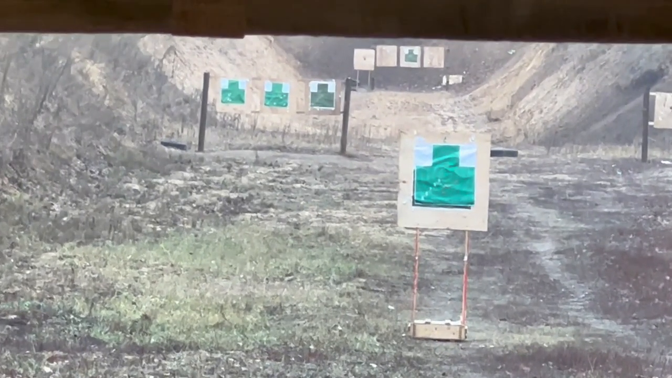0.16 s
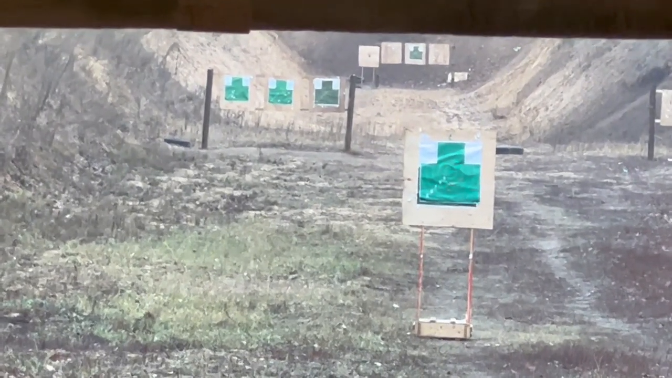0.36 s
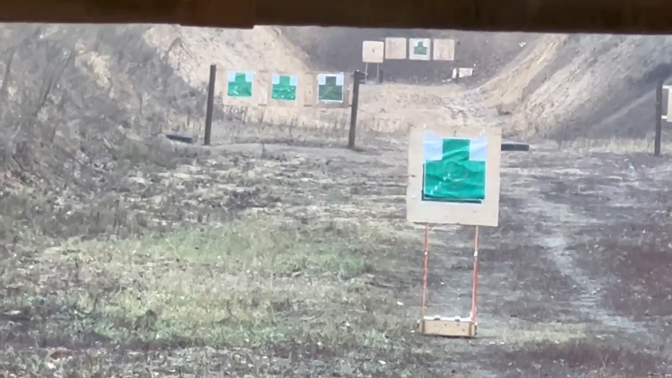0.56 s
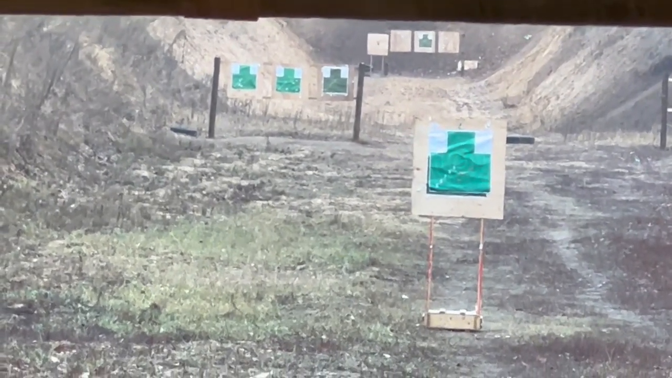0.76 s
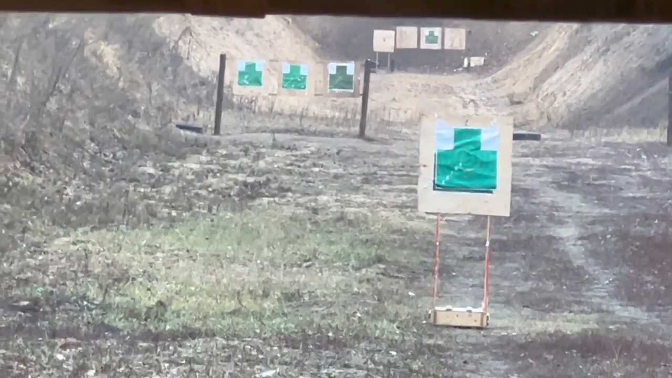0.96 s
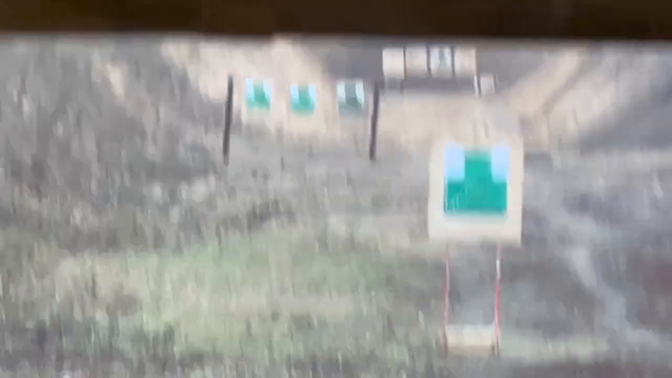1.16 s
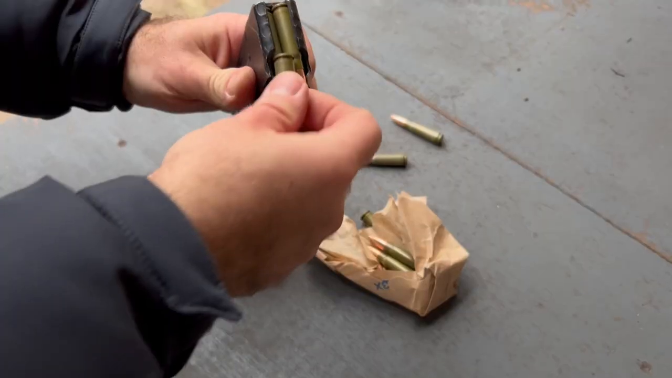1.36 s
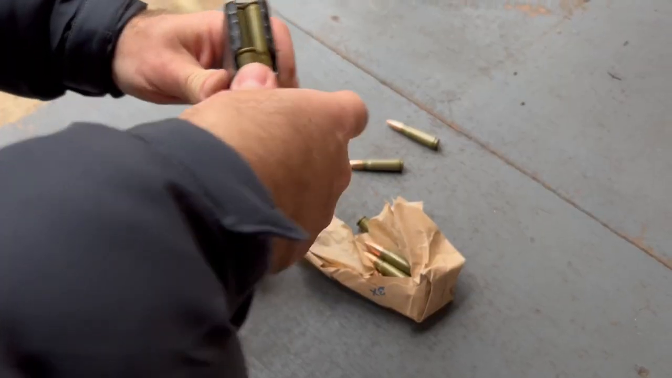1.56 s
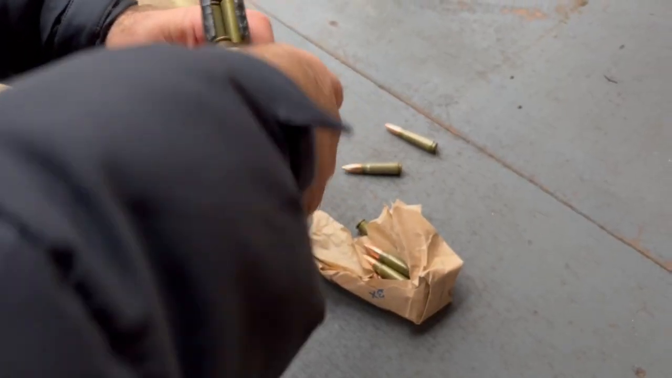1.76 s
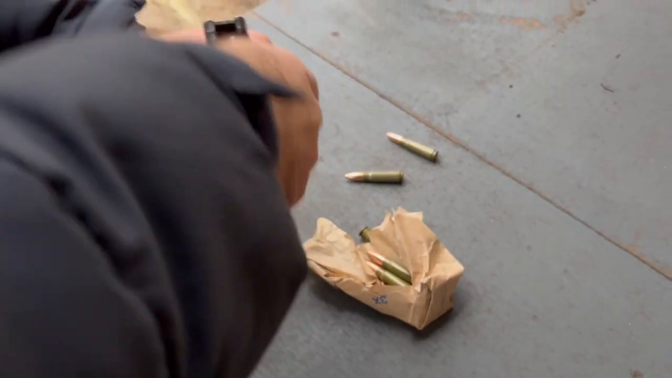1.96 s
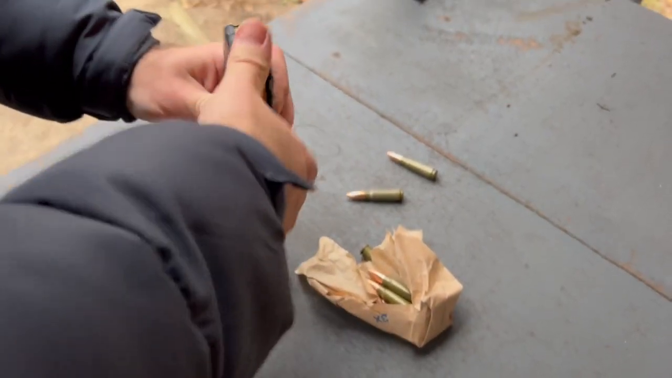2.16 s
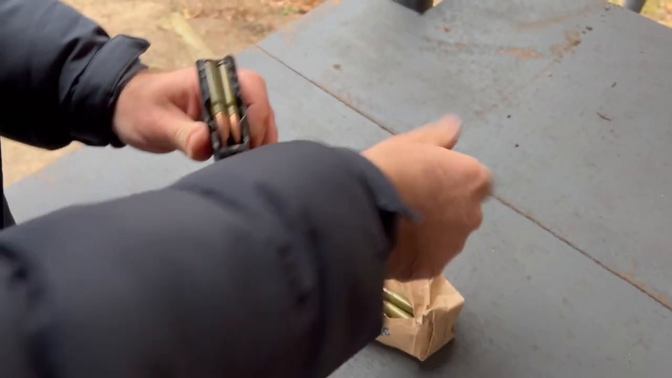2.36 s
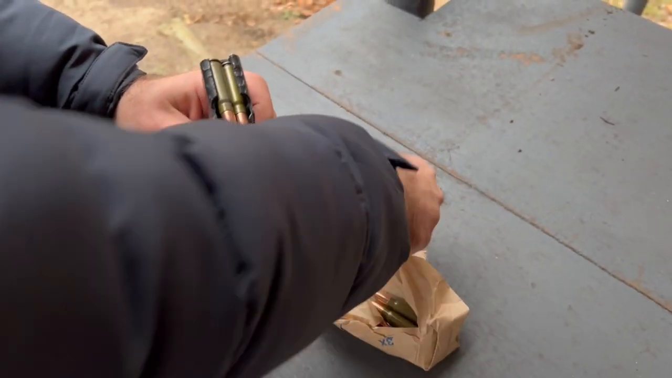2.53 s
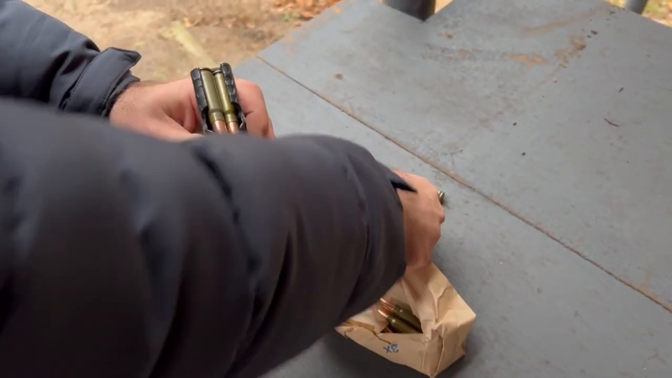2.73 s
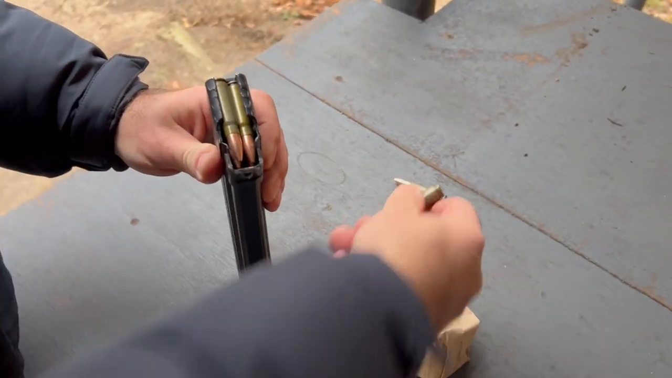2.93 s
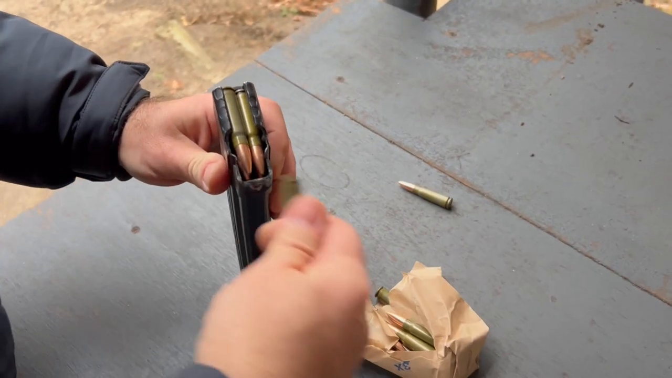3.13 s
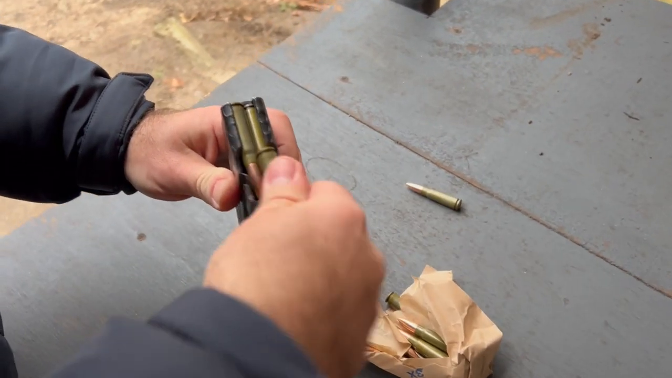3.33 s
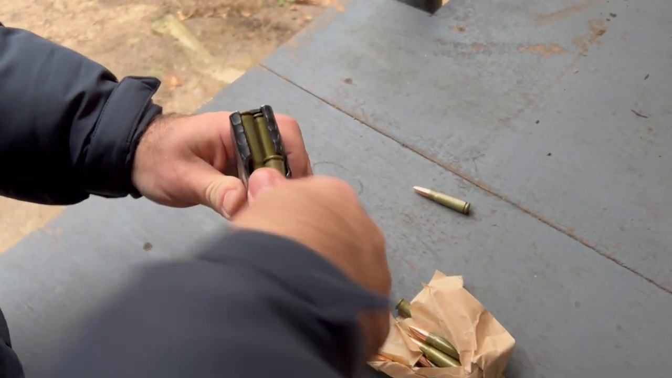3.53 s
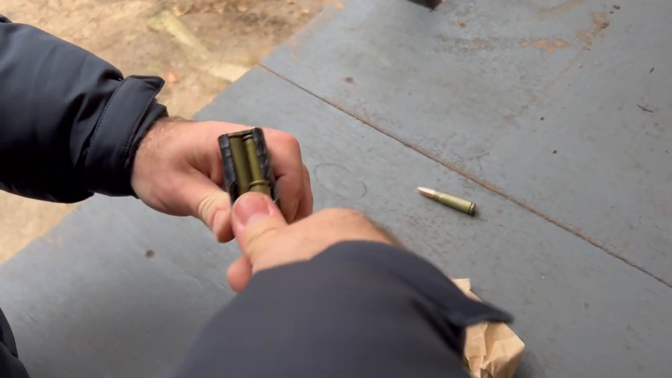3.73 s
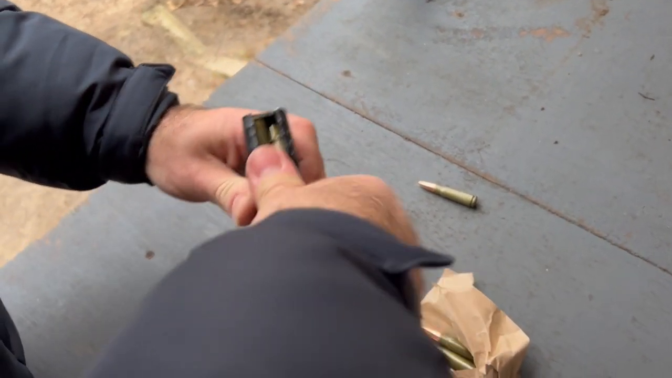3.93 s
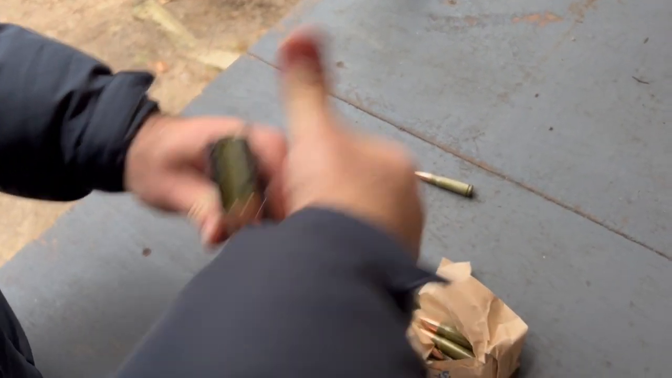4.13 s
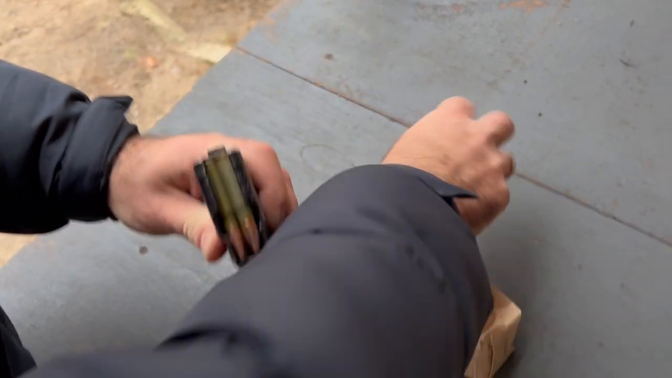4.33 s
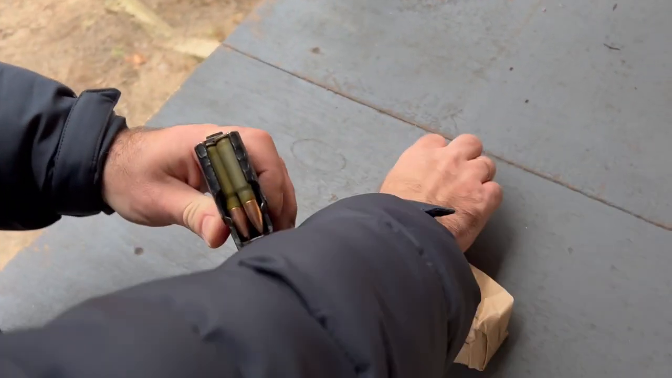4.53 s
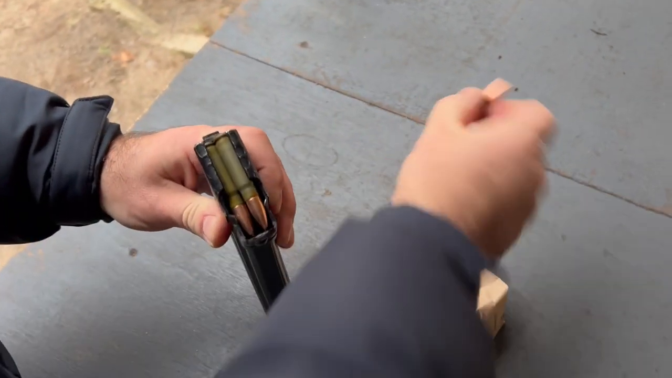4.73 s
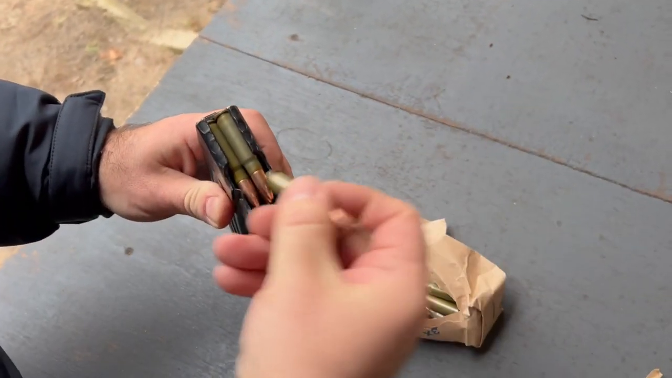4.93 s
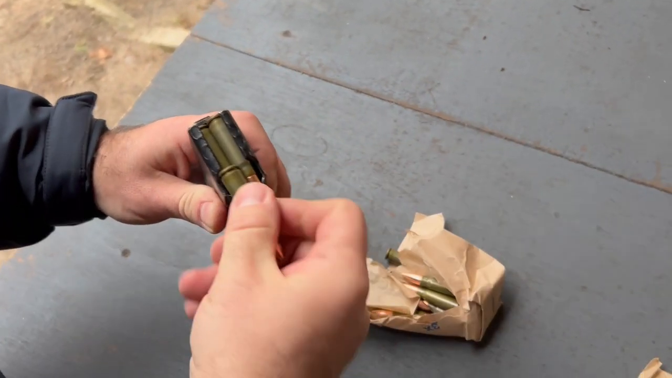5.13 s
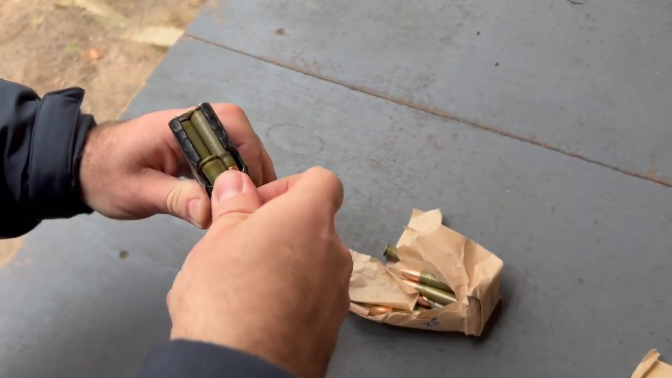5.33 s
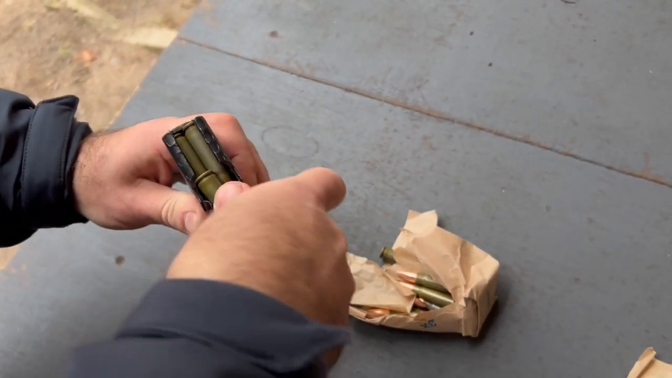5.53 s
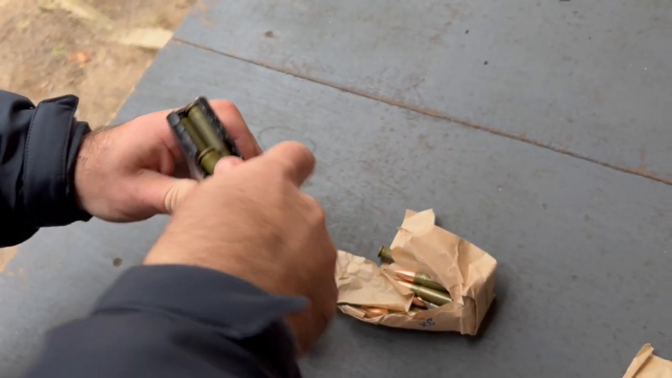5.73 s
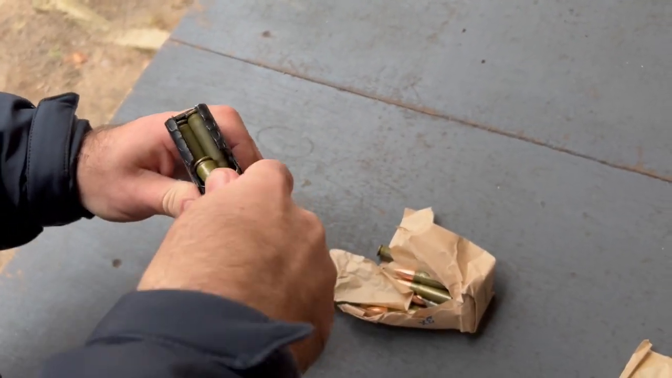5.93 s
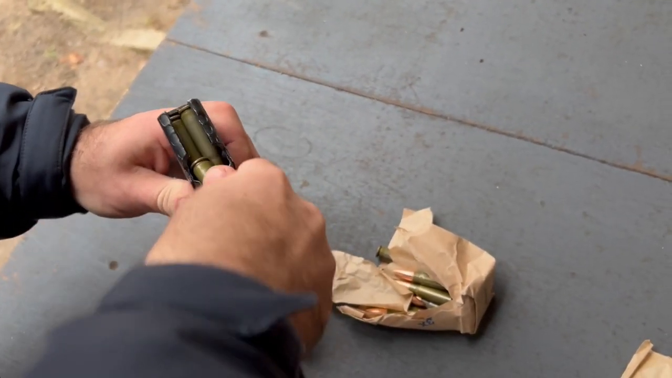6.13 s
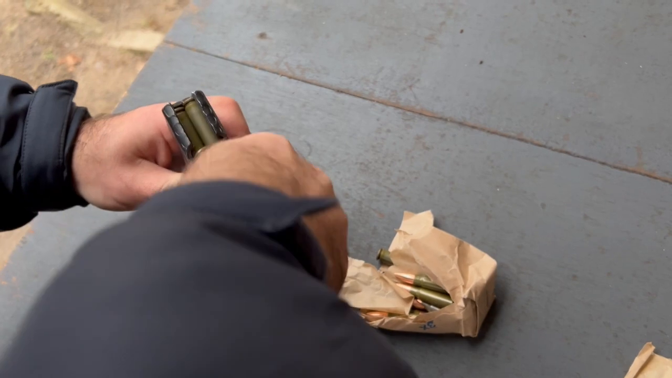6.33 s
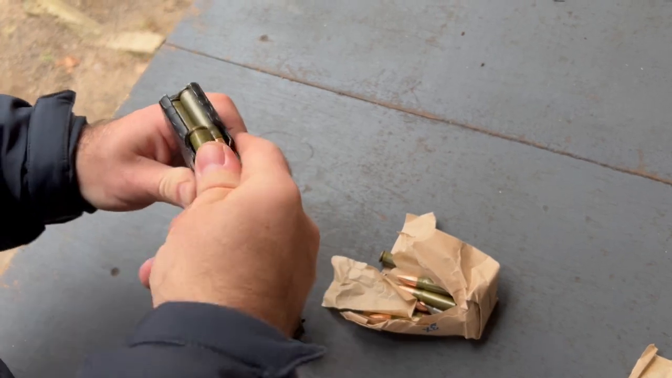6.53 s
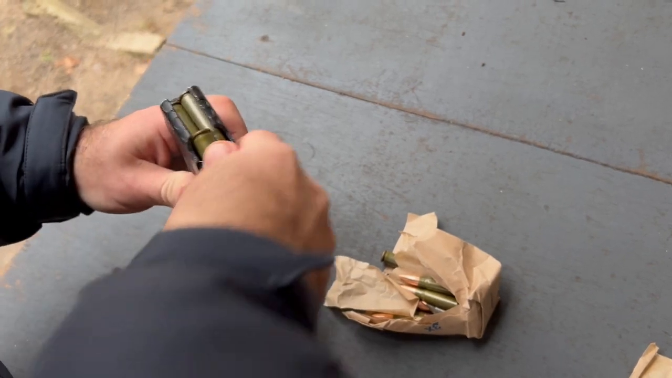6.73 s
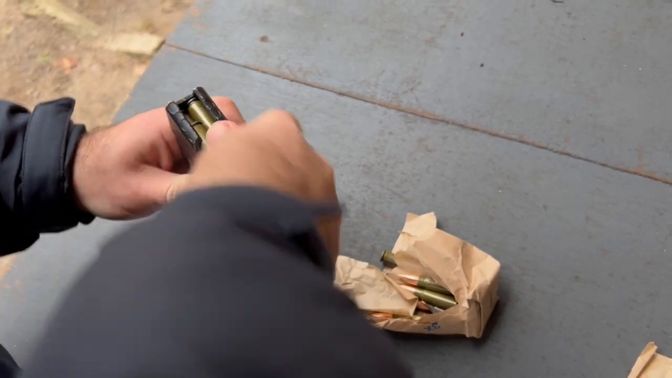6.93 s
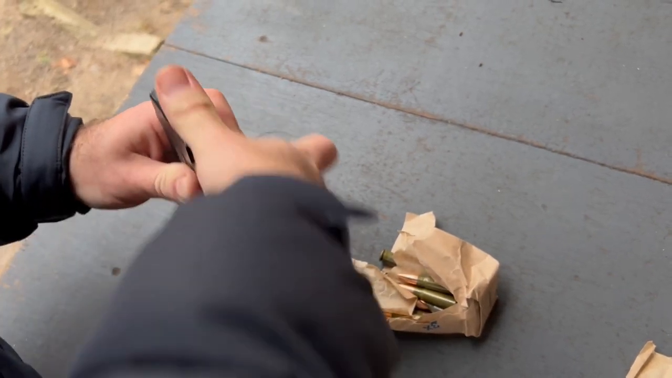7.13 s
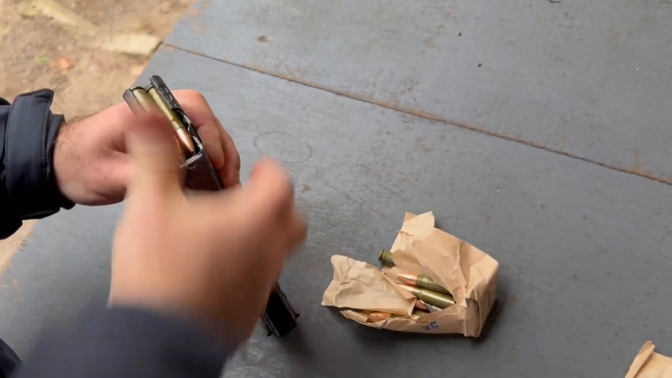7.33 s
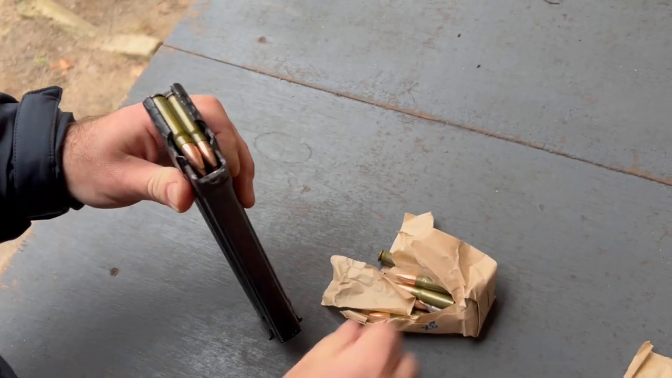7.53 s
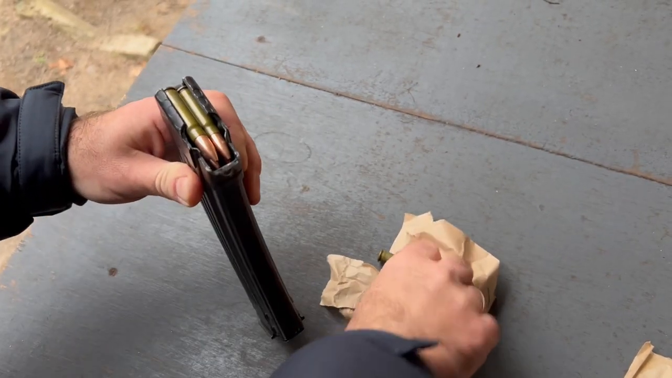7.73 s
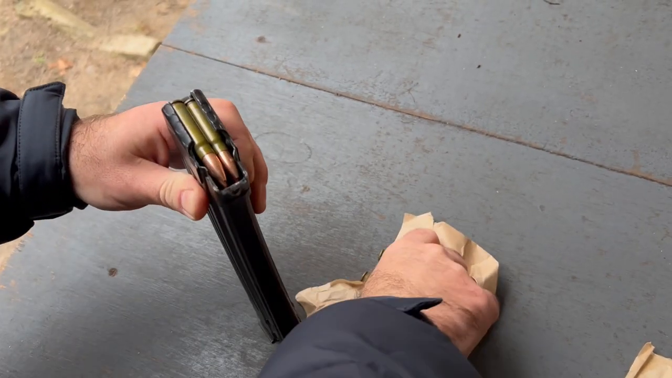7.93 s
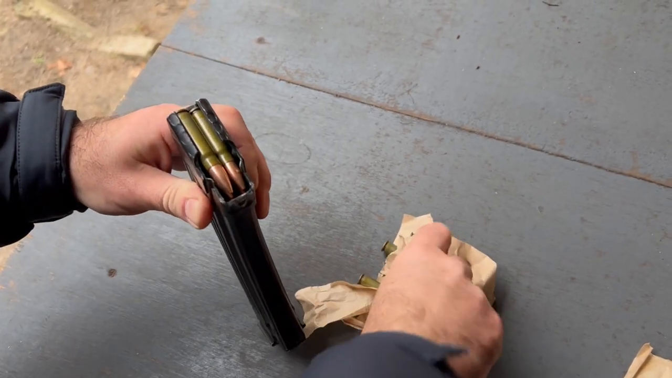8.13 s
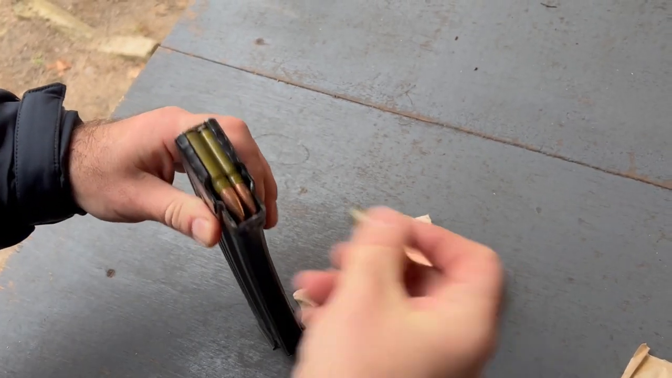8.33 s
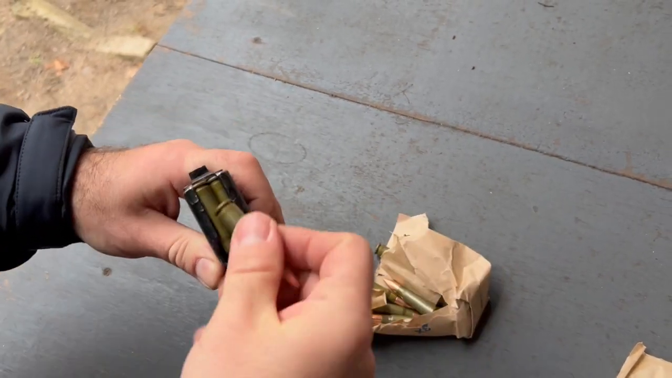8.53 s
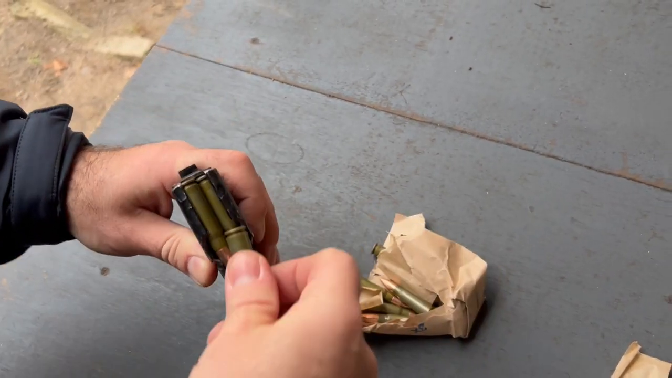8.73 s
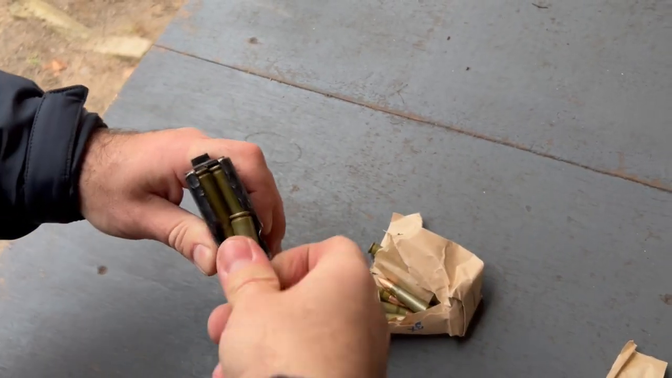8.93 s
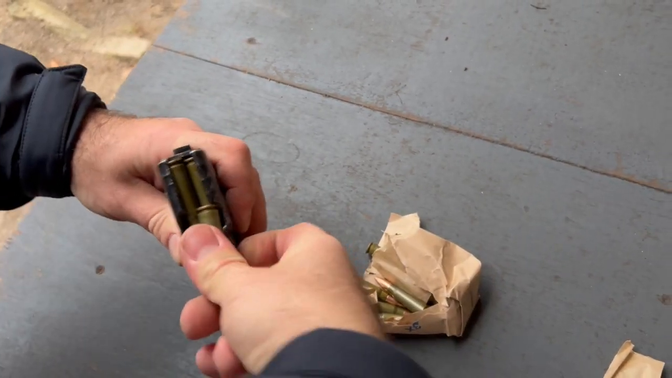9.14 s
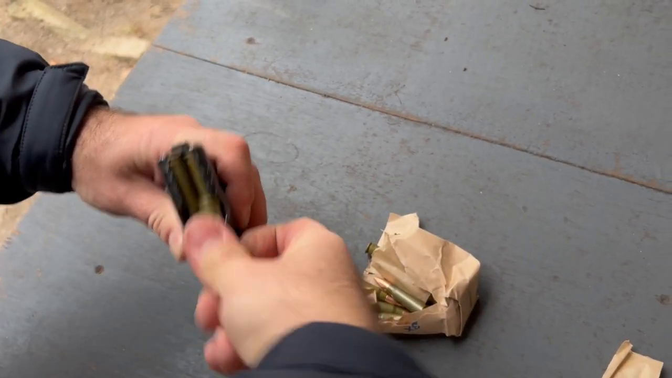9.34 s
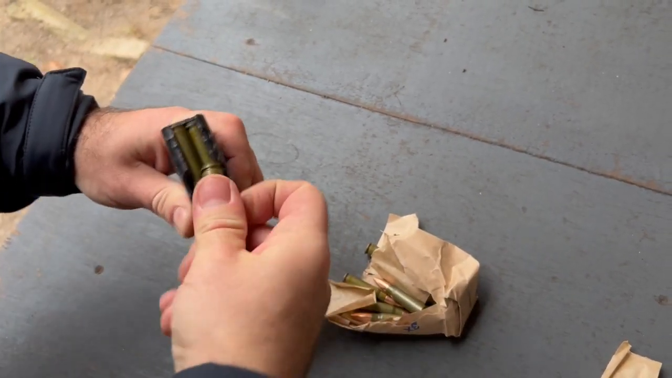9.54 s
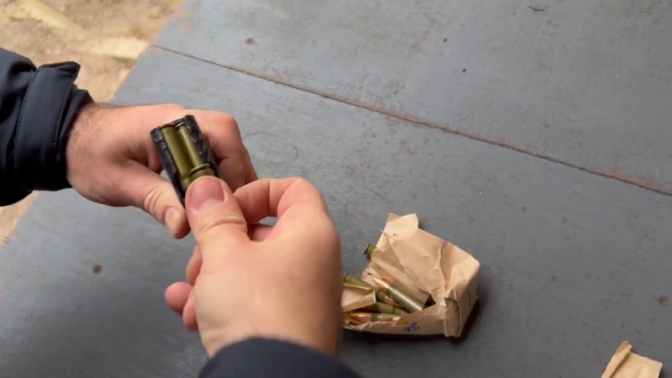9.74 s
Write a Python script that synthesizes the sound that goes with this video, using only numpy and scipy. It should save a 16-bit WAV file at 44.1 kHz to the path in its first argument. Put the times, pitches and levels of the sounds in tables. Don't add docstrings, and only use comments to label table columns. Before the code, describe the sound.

Sharp brass-on-steel clacks and dull bench knocks, a rustling sleeve and crackling paper, interrupted by one overloading gunshot echoing off earth banks.

```python
import sys
import numpy as np
from scipy import signal
from scipy.fft import rfft, irfft, next_fast_len
from scipy.io import wavfile
from scipy.ndimage import uniform_filter1d

SR = 44100
rng = np.random.default_rng(int(sys.argv[2]) if len(sys.argv) > 2 else 0)


def output_pcm(signal):
    pcm = np.clip(np.atleast_2d(signal).T, -1, 1) * 32767
    wavfile.write(sys.argv[1], SR, np.round(pcm).astype(np.int16))


def to_linear_factor(level_db):
    exponent = np.asarray(level_db, float) / 20
    return 10 ** exponent


N = 431298


def rms_one(x):
    return x / np.sqrt(np.mean(x ** 2) + 1e-20)


def in_time(rows, off=None):
    return np.interp(np.arange(N) / SR, *np.transpose(rows), off, off)


def at_hz(points, hz):
    knots_hz, values = np.transpose(points)
    return np.interp(np.log(hz), np.log(knots_hz + 1), values)


def drift(rate):
    r = np.exp(-80 * np.pi * rate / SR)
    slow = signal.lfilter([1], [1, -2 * r, r * r], rng.standard_normal(N // 40 + 2002))[2000:]
    return np.interp(np.arange(N) / 40, np.arange(len(slow)), rms_one(slow))


def band(x, low_hz, high_hz):
    return signal.sosfilt(signal.butter(2, [low_hz, high_hz], "band", fs=SR, output="sos"), x)


def rings(modes, count, detune, uneven_db, size=1800):
    t = np.arange(size) / SR
    draws = rng.standard_normal((count, len(modes), 2))
    out = 0
    for k, (hz, level_db, t60) in enumerate(modes):
        tone = np.sin(2 * np.pi * hz * (1 + detune * draws[:, k, :1]) * t)
        out = out + to_linear_factor(level_db + uneven_db * draws[:, k, 1:] - 60 * t / t60) * tone
    return out


def place(times, rows):
    out = np.zeros(N + rows.shape[1])
    for s, row in zip(times, rows):
        out[round(s * SR):][:len(row)] += row
    return out[:N]


def strokes(rows, hold):
    t = np.arange(N) / SR
    out = 0
    for s, length, db in rows:
        out = out + to_linear_factor(db) * np.sin(np.pi * np.clip((t - s) / length, 0, 1)) ** hold
    return out


# f/Hz, level/dB
SIDE_SPREAD = [(100, -42), (380, -14.5), (700, -7), (2400, -7), (8000, -13)]


def far_noise(colour, level_db, patchy_db):
    out = 0
    edges = 22 * 2 ** np.arange(0, 9.6, .5)
    white = rng.standard_normal((2, 2, N))
    centres = np.sqrt(edges[1:] * edges[:-1])
    total = np.sum(to_linear_factor(at_hz(colour, centres)) ** 2 * np.diff(edges)) * 2 / SR
    for k, hz in enumerate(centres):
        if colour[0][0] < hz < colour[-1][0]:
            gain = to_linear_factor(at_hz(colour, hz) + level_db(hz) + patchy_db * drift(11.5)) / np.sqrt(total)
            side_gain = to_linear_factor(at_hz(SIDE_SPREAD, hz))
            out = out + gain * band(white[k % 2], edges[k], edges[k + 1]) * [[1], [side_gain]]
    middle, side = out
    return np.array([middle + side, middle - side])


def opening():
    rumble = rms_one(band(rng.standard_normal(N), 28, 77))
    fade_s = 0.11
    return to_linear_factor(-64.5) * rumble * np.exp(-np.arange(N) / SR / fade_s)


# f/Hz, level/dB per Hz
DRONE_COLOUR = [(12, -43), (20, -8), (75, 2), (216, -7), (300, -13.5), (390, -51), (660, -120)]
# f/Hz, level/dB per Hz
AIR_COLOUR = [(150, -45.5), (250, -11.5), (887, -11.5), (1770, -18.5), (5000, -27.5), (6500, -61.5),
              (11000, -120)]
# f/Hz, level/dB per Hz
SLEEVE_COLOUR = [(2060, -36), (3500, -14), (7460, -6), (12000, -14), (13600, -15), (16000, -45)]
# t/s, level/dB
DRONE_LEVEL = [(0, -83), (.2, -99.5), (1.32, -79), (1.37, -55.5), (1.6, -47), (2.0, -45), (2.45, -52),
               (3.28, -59), (3.65, -52.5), (4.9, -66.5), (6.3, -52), (7.0, -41), (7.55, -51), (9.05, -50),
               (9.38, -57), (9.77, -49.5)]
# start t/s, length t/s, level/dB
SLEEVE_SWEEPS = [(.95, 0.44, -82), (1.33, 0.42, -52.5), (1.95, 0.78, -52), (2.3, 1.12, -61.5),
                 (3.45, 0.39, -60), (5.76, 0.11, -66), (6.25, 0.31, -72), (6.4, 0.3, -61),
                 (7.27, 0.25, -45.5), (7.5, 0.3, -47), (8.1, 0.6, -49), (8.5, 0.39, -49.5),
                 (9.15, 0.176, -68), (9.36, 0.56, -63)]
# start t/s, length t/s, level/dB
GATE_HUSHES = [
    (3.245, .085, -12),
    (5.73, .05, -5),
    (5.86, .1, -5),
    (6.2, .07, -6),
    (9.285, .11, -10),
]


def around():
    drone_db = in_time(DRONE_LEVEL)
    air_db = -60.5 + 0.78 * (drone_db + 53.5)
    rest = to_linear_factor(-61.5 + 0.7 * np.minimum(drone_db + 56.0, 0))
    drone = far_noise(DRONE_COLOUR, lambda hz: drone_db, patchy_db=2.5)
    air = far_noise(AIR_COLOUR, lambda hz: air_db, patchy_db=4.5)
    sleeve = far_noise(SLEEVE_COLOUR, lambda hz: 0, patchy_db=1.5)
    gate = to_linear_factor(sum(db * strokes([(s, length, 0)], hold=.3) for s, length, db in GATE_HUSHES))
    return drone + np.sqrt(gate) * air + gate * (rest + strokes(SLEEVE_SWEEPS, hold=1.0)) * sleeve


# t/s, level/dB, brightness/dB
DISTANT_TAPS = [
    (0.5384, -42.5, 9.5),
    (0.754, -45, 4),
    (1.0085, -36.5, 11.5),
]
# t/s, level/dB, brightness/dB, length t/ms
ROUND_1 = [(1.357, -28, 13, 6.1), (1.369, -25.5, 6, 4), (1.3874, -15, -3.5, 5.3), (1.49, -27, -18, 3.4),
           (1.509, -23.5, -20.5, 2.5), (1.545, -32.5, -13, 13), (1.5581, -30, -1, 2.9),
           (1.567, -27, -11.5, 3), (1.6007, -28.5, -14.5, 16), (1.6219, -23.5, -8.5, 2.26),
           (1.646, -35.5, -16, 12), (1.663, -39, -23, 3.5), (1.6896, -21, -9, 5.3), (1.7, -22.5, 1.5, 8),
           (1.711, -35.5, 11, 3.7), (1.735, -41, -16.5, 4), (1.7614, -44.5, 19.5, 4.1),
           (1.81, -45, -9.5, 5.3), (1.839, -36.5, 6, 6.9), (1.8306, -33, -8.5, 4.1),
           (1.884, -40, -18.5, 2.3), (1.901, -41.5, -2, 5.9), (1.9221, -17.5, -12.5, 23),
           (1.9327, -9, 1.5, 5.8), (1.943, -9, -12, 6.3), (1.9609, -8, -10.5, 3.7), (2.029, -27, -7.5, 8.8),
           (2.045, -31, 1.5, 8.5), (2.074, -45.5, 21, 5.2), (2.085, -27.5, -7, 2.8),
           (2.0935, -19.5, -6, 6.2), (2.1, -12.5, 0, 8.6), (2.126, -34.5, 15, 4),
           (2.1137, -16.5, -8.5, 4.9), (2.153, -28, -13.5, 2.8), (2.177, -15.5, -11.5, 4.4),
           (2.1923, -17.5, -6.5, 4.4), (2.273, -33, -13, 5.5), (2.278, -28.5, -8.5, 5),
           (2.287, -18, -5.5, 6), (2.306, -38.5, 8, 4), (2.2952, -14, 5.5, 3.2)]
# t/s, level/dB, brightness/dB, length t/ms
ROUND_2 = [(3.335, -30.5, 1, 3.4), (3.394, -22, 6, 6.3), (3.347, -46.5, -17.5, 12), (3.36, -44.5, -1, 6),
           (3.4029, -10.5, 6, 5.3), (3.427, -30.5, -8, 3.5), (3.415, -22, 0.5, 3.9), (3.4539, -24, -8, 3.3),
           (3.475, -21.5, -12, 5.7), (3.515, -21.5, -9, 3.3), (3.5398, -23.5, -16.5, 2.9),
           (3.502, -37, -14.5, 6.4), (3.559, -37.5, -12, 6.5), (3.583, -33, 12.5, 10),
           (3.595, -35.5, 8.5, 17), (3.615, -39, 9, 20), (3.721, -45.5, 9, 4.4), (3.7094, -18.5, -4, 5.9),
           (3.8643, -18, -17, 3.5), (3.8744, -22, 14, 19), (3.8839, -18, 17.5, 3.5),
           (3.9384, -15.5, 2, 3.5)]
# t/s, level/dB, brightness/dB, length t/ms
ROUND_3_FUMBLED = [(5.078, -33, 1, 8.3), (5.0953, -26, -5, 3), (5.176, -31.5, -21, 2.3),
                   (5.2408, -41, -12, 4.9), (5.2973, -27, -1, 10.5), (5.4973, -43.5, -9, 9.2),
                   (5.5947, -24, -7.5, 2.4), (5.719, -48.5, 3, 2.3), (5.9728, -35.5, -4, 1.2),
                   (5.9929, -29, -12, 9.3), (5.289, -39, -20, 4.6), (5.345, -46, -6, 4),
                   (5.982, -34.5, 1.5, 3.7), (6.035, -40, 8, 4.8), (6.043, -30.5, -4.5, 3.6),
                   (6.172, -42, -12.5, 4.1), (6.05, -20, -5, 1.4), (6.063, -21.5, -6, 6.3),
                   (6.1036, -19, -15.5, 2.6), (6.131, -46, -28, 1.9), (6.1797, -37, -13, 6)]
# t/s, level/dB, brightness/dB, length t/ms
ROUND_3_HOME = [(6.431, -32, -24, 2.7), (6.47, -25, -10, 4), (6.5176, -20, 4.5, 4), (6.387, -62, 24, 4),
                (6.396, -53.5, 21, 4), (6.438, -31.5, -8, 4), (6.487, -43.5, 1, 4), (6.531, -23, -5, 5),
                (6.539, -12, 12.5, 5), (6.542, -12, -7, 10), (6.556, -23.5, -3, 8), (6.58, -27.5, -6, 6),
                (6.636, -24.5, -6.5, 4), (6.643, -31, -5, 8), (6.655, -31, -14.5, 7.9),
                (6.766, -46.5, -5, 4), (6.776, -44.5, -0.5, 4), (6.7356, -35, 1, 1.6),
                (6.8042, -22, -8, 5.4), (6.8282, -19.5, -9, 10), (6.852, -20, -2, 19), (6.871, -7.5, -2, 7),
                (6.881, -7.5, -5, 13), (6.89, -17.5, 4, 6), (6.9, -16.5, -12, 4), (6.91, -28, 3.5, 2.7),
                (6.972, -17, -3.5, 4.7), (6.984, -16.5, -5.5, 6.9), (6.996, -12, -2.5, 5.4),
                (7.0109, -18, -8, 4.1), (7.03, -14, -9, 4.1), (7.041, -25, -2, 6.8), (7.137, -6, 0, 3.85),
                (7.2047, -37.5, 6.5, 7.7), (7.233, -32.5, -11, 19.5), (7.2732, -42.5, -23, 8),
                (7.292, -42.5, -13, 3.3), (7.3386, -49, -27, 3.5)]
# t/s, level/dB, brightness/dB, length t/ms
ROUND_4 = [(8.535, -47, 15, 1.7), (8.544, -19.5, 32.5, 5.3), (8.547, -37, 13, 6), (8.575, -45, 9.5, 5.3),
           (8.56, -9, -2, 5.2), (8.7227, -17, 1, 4), (8.729, -18.5, 10, 9.9), (8.736, -10, 4.5, 6.2),
           (8.7407, -16.5, -16, 2.6), (8.753, -22.5, -5.5, 14), (8.808, -18.5, -9, 3.3),
           (8.8475, -25.5, -4, 4), (8.8962, -24.5, -20.5, 5.4), (8.836, -36.5, -6, 6.7),
           (8.862, -33, -8, 4), (8.889, -33, -2, 3.3), (8.913, -43, -1, 3), (8.925, -12.5, -4.5, 5.8),
           (8.9586, -32.5, 20.5, 4.9), (9.0953, -43, -2, 7.4), (9.206, -40, -2.5, 4.8),
           (9.4413, -49.5, -14, 3.1), (9.565, -60, -13, 3.1), (9.575, -55, -11, 3.5), (9.601, -41, -4, 7.1),
           (9.609, -13, -2, 4.4), (9.615, -11.5, 5, 6.7), (9.621, -7.5, 3, 8), (9.634, -27, 1, 12),
           (9.652, -31, -7, 6.8), (9.666, -30, -2, 6.2), (9.683, -35, -11, 3.3), (9.718, -26.5, -11, 5.5),
           (9.709, -21.5, -1.5, 5.5), (9.7566, -33.5, -11, 6.4)]


def touches():
    taps = [(*row, 4.9) for row in DISTANT_TAPS]
    rounds = ROUND_1 + ROUND_2 + ROUND_3_FUMBLED + ROUND_3_HOME + ROUND_4
    rows = sorted(taps + [tuple(row) for row in rounds])
    s, walls_db, bright_db, length_ms = np.transpose(rows)
    body_db = walls_db + 1 - 0.5 * bright_db
    return s, body_db, walls_db, body_db + bright_db, length_ms


# f/Hz, level/dB, 60 dB decay t/s
BODY_MODES = [(1225, 0, .015), (1330, -1, .012), (1500, -6, .008)]
# f/Hz, level/dB, 60 dB decay t/s
WALL_MODES = [(1960, -2, .01), (2380, 2, .012), (2750, -2, .009), (3300, -7, .008), (3680, -5, .008),
              (4050, -4, .008)]
# f/Hz, level/dB, 60 dB decay t/s
LIP_MODES = [(5950, 1.9, 0.0041), (6730, 5.9, 0.0027), (7990, 12, 0.0014)]
# f/Hz, level/dB, 60 dB decay t/s
HOLLOW_MODES = [(340, -42, .06), (510, -30, .05)]


def contacts():
    s, *levels, length_ms = touches()
    t, lead_s = np.arange(2600) / SR, 900 / SR
    spread_s = np.sqrt(np.maximum(length_ms ** 2 - 11, 2))[:, None] / 2400
    late = t - lead_s + 0.0015
    swell = np.exp(-.5 * (late / (spread_s * np.where(late < 0, .45, 1.4))) ** 2)
    creep = to_linear_factor(-26.0) * np.exp(np.minimum(late, 0) / 0.016) * (late < 0)
    settle = to_linear_factor(-15.0) * np.exp(-np.maximum(late, 0) / 0.01) * (late > 0)
    size = (len(s), len(t))
    blows = rng.standard_normal(size) * to_linear_factor(6.2 * rng.standard_normal(size))
    soft_ends = np.hanning(len(t) + 2)[1:-1] ** .3
    chatter = blows * (swell + creep + settle) * soft_ends
    out = 0
    # modes, low Hz, high Hz, strength of crack, trim dB
    parts = [(BODY_MODES, 1100, 1600, 20.0, -1.5),
             (WALL_MODES, 1700, 5000, 32.0, 1.5),
             (LIP_MODES, 5000, 13500, 12.0, 2.5)]
    for level_db, (modes, low_hz, high_hz, crack, trim_db) in zip(levels, parts):
        response = rings(modes, len(s), detune=.028, uneven_db=3.2)
        click = np.eye(1, response.shape[1])[0]
        response += crack * band(click, low_hz, high_hz)
        rows = signal.fftconvolve(chatter, response, axes=1)
        power = uniform_filter1d(2 * rows ** 2, size=110, axis=1).max(axis=1)
        out = out + rows * (to_linear_factor(level_db + trim_db) / np.sqrt(power))[:, None]
    steel = place(s - lead_s, out)
    air_ring = rings(HOLLOW_MODES, 1, detune=0, uneven_db=0, size=5000)[0]
    hollow = signal.fftconvolve(steel, air_ring)[:N] / 20
    above = signal.butter(8, 1130, "high", fs=SR, output="sos")
    return signal.sosfilt(above, steel) + hollow


def far_ring():
    s, db, _ = np.transpose(DISTANT_TAPS)[:, :, None]
    t = np.arange(9000) / SR
    return place(s[:, 0], to_linear_factor(db - 19 - 60 * t / 0.26) * np.sin(2 * np.pi * 1195 * t))


# t/s, knock level/dB, hum level/dB
BENCH_PUSHES = [(1.566, -30.5, -37), (1.69, -21.5, -39), (1.799, -37, -42), (1.927, -20, -45.5),
                (1.941, -14, -30.5), (2.03, -30.5, -33.5), (2.1, -14.5, -32.5), (2.152, -25.5, -37.5),
                (2.176, -28, -35), (2.273, -29, -38), (2.293, -23.5, -30), (2.56, -52, -51),
                (2.707, -31, -41), (2.855, -42.5, -39), (3.402, -34.5, -45.5), (3.54, -27, -24.5),
                (3.705, -33.5, -42.5), (3.868, -18, -30.5), (5.598, -26.5, -35.5), (6.105, -19.5, -23.5),
                (6.543, -18, -21), (6.638, -30.5, -47), (6.871, -15, -29.5), (6.997, -14.5, -30),
                (7.139, -28.5, -44), (7.27, -39, -41), (7.336, -39, -32), (7.773, -26, -32),
                (7.842, -27, -29.5), (8.599, -36.5, -29.5), (8.638, -39, -33), (8.746, -33.5, -24.5),
                (8.898, -28, -29.5), (9.095, -42.5, -36.5), (9.618, -21, -20)]
# f/Hz, level/dB, 60 dB decay t/s
BENCH_MODES = [(70.9, -4.5, 0.37), (140.3, -4.5, 0.16)]
# f/Hz, level/dB, 60 dB decay t/s
BASE_MODES = [(338, -18, .18), (505, -14, .13)]


def bench():
    s, knock_db, hum_db = np.transpose(BENCH_PUSHES)[:, :, None]
    t = np.arange(18000) / SR
    knock_hz = 212 * (1 + 0.05 * rng.standard_normal(s.shape))
    knock = np.sin(2 * np.pi * knock_hz * t) * to_linear_factor(-60 * t / 0.047) * np.minimum(t / 0.0021, 1)
    for hz, db, t60 in BASE_MODES:
        knock = knock + to_linear_factor(db - 60 * t / t60) * np.sin(2 * np.pi * hz * t)
    thud = rng.standard_normal((len(s), len(t))) * np.exp(-t / .006)
    knock = knock + to_linear_factor(-3) * 4.13 * band(thud, 280, 770)
    hum = rings(BENCH_MODES, len(s), detune=0.03, uneven_db=2.0, size=18000) * np.minimum(t / 0.02, 1)
    hum = place(s[:, 0], to_linear_factor(hum_db) * band(hum, 48, 400))
    return place(s[:, 0], to_linear_factor(knock_db) * knock) + hum * to_linear_factor(2.5 * drift(9))


# start t/s, length t/s, level/dB
FINGER_SCUFFS = [
    (2.6, 0.1, -42),
    (2.66, 0.14, -37.5),
    (2.78, 0.13, -47),
    (7.766, 0.035, -23),
    (7.8, 0.094, -28),
    (7.94, 0.14, -42),
    (8.012, 0.091, -38.5),
    (8.115, 0.13, -37.5),
]
# start t/s, length t/s, level/dB
CASE_SLIDES = [
    (3.55, 0.12, -44.5),
    (8.56, 0.18, -40),
]


def scuffs():
    sizes = to_linear_factor(3.6 * np.minimum(rng.exponential(1, N), 5))
    grains = (rng.random(N) < 7000 / SR) * sizes * rng.choice([-1, 1], N)
    grains = grains + rng.standard_normal(N) * (rng.random(N) < .5)
    dealt, edges = rng.integers(0, 8, N), np.geomspace(500, 11000, 9)
    paper = 0
    for k in range(8):
        part = grains * (dealt == k) * to_linear_factor(2.1 * drift(35.0) - 1.0 * k)
        paper = paper + band(part + 1e-18, edges[k], edges[k + 1])
    slide = rms_one(band(rng.standard_normal(N) * to_linear_factor(2.0 * drift(60)), 3200, 6200))
    return strokes(FINGER_SCUFFS, hold=0.71) * rms_one(paper) + strokes(CASE_SLIDES, hold=.5) * slide


def crackles(rows):
    t, span = np.arange(1200) / SR, 1.244
    fade = np.exp(-t / 0.0014) * np.minimum(t / 0.0012, 1)
    grit = rng.standard_normal((len(rows), 2, 1200)) * fade
    snaps = []
    for (_, db, hz, top_db), (low, high) in zip(rows, grit):
        low = band(low, hz / span, hz * span)
        high = band(high, 5300, 13000)
        snaps.append(to_linear_factor(db) * low / abs(low).max() + to_linear_factor(top_db + 10.0) * high / abs(high).max())
    return place([row[0] for row in rows], np.array(snaps))


# t/s, level/dB, centre f/Hz, top level/dB
PAPER_SNAPS = [(2.643, -41, 2500, -36), (2.685, -44, 3000, -29.5), (2.7055, -22.5, 1100, -40),
               (2.713, -30, 1500, -54), (2.727, -30, 1200, -48), (2.727, -22.5, 3700, -50),
               (2.762, -34, 1400, -47), (2.784, -31.5, 2430, -36.5), (3.4015, -1, 4310, -23),
               (6.1035, -10.5, 2400, -50.5), (7.7474, -33, 1500, -53), (7.77, -29, 2000, -28),
               (7.7767, -13, 3200, -20.5), (7.783, -22, 3200, -20.5), (7.807, -20, 2500, -23.5),
               (7.8225, -22, 3500, -19), (7.839, -10, 3200, -25), (7.843, -11, 3060, -21),
               (7.848, -11, 3500, -11), (7.864, -15, 2840, -26), (7.879, -39, 2500, -34),
               (7.902, -25, 3800, -27), (7.92, -35, 2200, -41.5), (7.958, -33, 4000, -49),
               (7.969, -25, 4000, -34.5), (7.981, -21.5, 3450, -26.5), (8.005, -26, 3000, -35),
               (8.0195, -9, 3550, -30), (8.03, -25, 4000, -26), (8.05, -37, 3000, -34),
               (8.062, -37, 1500, -34), (8.126, -23.5, 3500, -22.5), (8.14, -36, 4000, -33.5),
               (8.166, -28, 1900, -42), (8.186, -34, 3500, -36), (8.217, -27, 2950, -33),
               (8.226, -24, 1590, -52), (8.279, -36, 2130, -31.5), (8.294, -38, 2490, -44),
               (8.3454, -37, 1980, -34)]


def picking():
    return crackles(PAPER_SNAPS)


# t/s, boom level/dB, crack level/dB, boom f/Hz
BLAST_ARRIVALS = [
    (3.939, -13, -28, 230),
    (3.9767, 4.5, -5.5, 234.6),
    (3.9849, -1.5, -1, 200),
    (3.9968, -5.5, -22, 190),
    (4.0066, -1.5, -12, 200),
    (4.0116, 0.5, -11, 200),
    (4.0227, -5.5, -15, 190),
    (4.037, -12, -18, 200),
    (4.058, -14, -26.5, 230),
]


def shot():
    s, boom_db, crack_db, boom_hz = np.transpose(BLAST_ARRIVALS)[:, :, None]
    t = np.arange(2600) / SR
    n_wave = np.where(t < .0009, 1 - 2 * t / 0.0009, 0)
    late = np.maximum(t - .0022, 0)
    boom = -np.sin(2 * np.pi * boom_hz * late) * to_linear_factor(-60 * late / 0.017)
    grit = 1.11 * rng.standard_normal((len(s), 2600)) * np.exp(-(t / 0.0038) ** 2)
    crack = n_wave + band(grit, 600, 5100)
    return band(place(s[:, 0], to_linear_factor(boom_db) * boom + to_linear_factor(crack_db) * crack), 85, 12000)


# f/Hz, level/dB per Hz
ROLL_SPECTRUM = [(35, -35), (60, -12.5), (180, -8), (399, -7), (800, -6), (2160, -11), (7390, -14.5),
                 (11400, -23.5), (14000, -101.5)]
# t/s, level/dB
BANK_ANSWER = [
    (4.05, -61),
    (4.17, -33.5),
    (4.3, -25),
    (4.45, -25),
    (4.58, -29),
    (4.8, -35),
    (5.2, -39),
    (5.8, -43),
    (6.4, -54),
]


def roll():
    t = np.arange(N) / SR
    fore_s, shot_s = 3.942, 3.976
    roof_db = np.where(t < shot_s, -16, -9.5 - 106 * (t - shot_s))
    roof_db = np.where(t < fore_s, -150, roof_db)
    banks_db = in_time(BANK_ANSWER, off=-150)
    path_s = np.maximum(t - 4.56, 0)

    def level_db(hz):
        top = np.clip(np.log2(hz / 500) / 1.8, 0, 1)
        near_db = roof_db - 9.5 * top - 9.0 * (hz < 480) * (t < shot_s)
        air_loss_db = 7 * (max(hz - 500, 0) / 1000) ** 0.98 * path_s
        far_db = banks_db - 4.5 * np.log2(max(hz / 1700, 1)) - air_loss_db
        return 20 * np.log10(np.hypot(to_linear_factor(near_db), to_linear_factor(far_db)) + 1e-9)

    return band(far_noise(ROLL_SPECTRUM, level_db, patchy_db=1.33) * to_linear_factor(1.1 * drift(160)), 64, 9000)


# t/s, level/dB, centre f/Hz, top
# level/dB
POST_ECHOES = [
    (3.968, -25, 6450, -43),
    (4.09, -25.5, 125, -60),
    (4.159, -50, 8030, -27),
    (4.344, -24, 1003, -47),
    (4.421, -10.5, 3200, -43),
    (4.556, -15.5, 1870, -51.5),
]


def echoes():
    return crackles(POST_ECHOES)


def roof(x):
    t = np.arange(9000) / SR
    tail = rng.standard_normal((2, 9000)) * to_linear_factor(-60 * t / 0.15) * np.minimum(t / 0.0022, 1)
    tail = tail[0] + 0.18 * tail[1] * [[1], [-1]]
    tail = band(tail, 350, 6000) / np.sqrt(np.sum(tail[0] ** 2))
    return signal.fftconvolve(x[None], tail, axes=1)[:, :N]


# f/Hz, lead/radians
PORT_LEAD = [(150, 0.05), (950, 0.4), (2150, 0.1), (2670, 0.3), (4570, -0.8), (4910, -1.8), (5430, -6.1),
             (7240, -6.5), (12800, -8.95), (16000, -9.0)]
# f/Hz, level/dB, left minus right level/dB
HOUSING_COLOUR = [(310, 1.47, -2), (710, -2.5, -2.5), (2720, -1, 2), (3550, -7.5, 4), (5270, -4.5, -0.5),
                  (5540, -7, 0), (9360, -6.5, -0.1), (12100, -4, 0)]


def at_ports(x):
    size = next_fast_len(N + 4096)
    hz = np.arange(size // 2 + 1) * SR / size + 1
    knots, gain_db, lean_db = np.transpose(HOUSING_COLOUR)
    lean = to_linear_factor(np.interp(hz, knots, lean_db) / 2 * np.minimum(hz / knots[1], 1) ** 2)
    turn = np.exp(.5j * at_hz(PORT_LEAD, hz)) * lean
    return irfft(rfft(x, size) * to_linear_factor(np.interp(hz, knots, gain_db)) * [turn, 1 / turn], size)[:, :N]


def scene():
    steel = contacts() + picking()
    wood = bench()
    near = steel + far_ring() + scuffs() + wood + shot() + echoes()
    near = near + to_linear_factor(-12.5) * roof(steel + to_linear_factor(7.0) * wood)
    far = roll() + around() + opening()
    sway = .3 * drift(70) * band((near + far).mean(axis=0), 1700, 8000)
    return at_ports(near + far + sway * [[1], [-1]])


def top_cut(x):
    return signal.sosfilt(signal.butter(12, 16420, fs=SR, output="sos"), x)


def record(dry):
    dry = signal.sosfilt(signal.butter(2, 30, "high", fs=SR, output="sos"), dry)
    limited = 1.25 * np.tanh(dry / 0.89)
    mix = signal.sosfilt(signal.cheby2(12, 60, 16700, fs=SR, output="sos"), limited)
    return top_cut(mix)


dry = scene()
out = record(dry)
output_pcm(out)
```